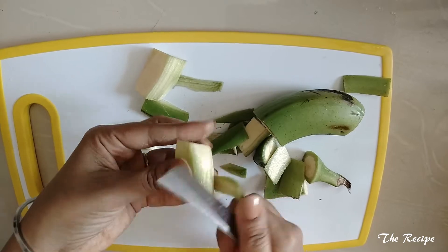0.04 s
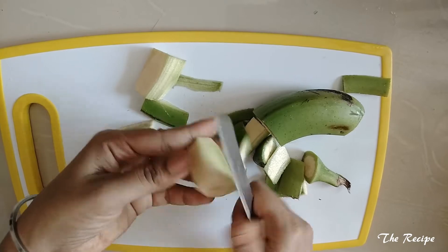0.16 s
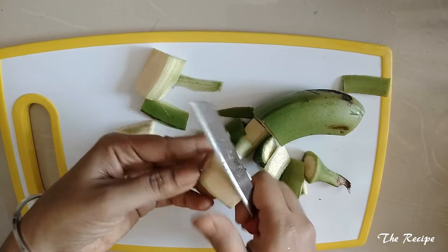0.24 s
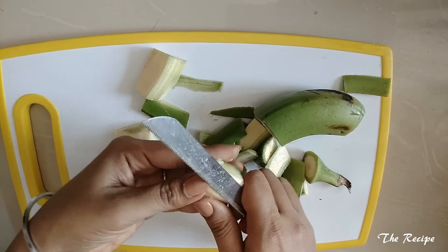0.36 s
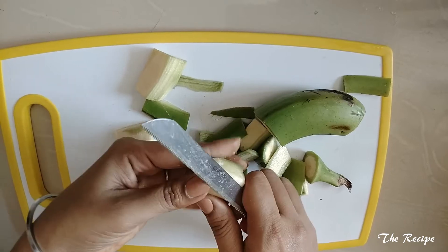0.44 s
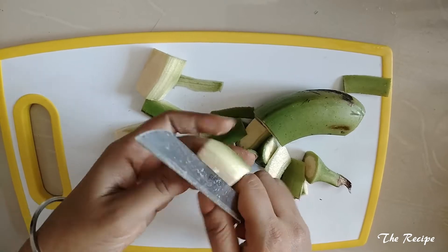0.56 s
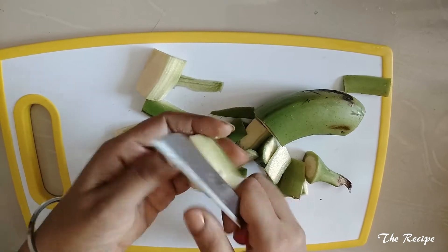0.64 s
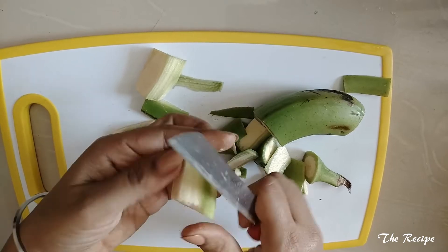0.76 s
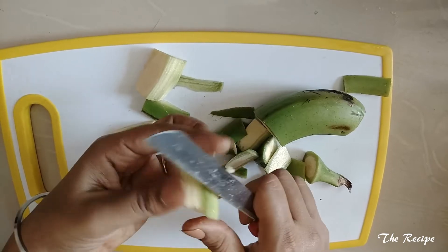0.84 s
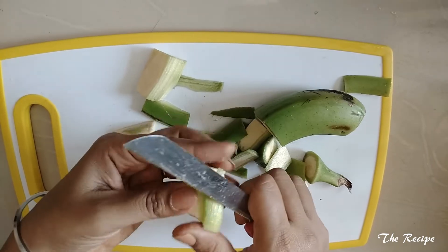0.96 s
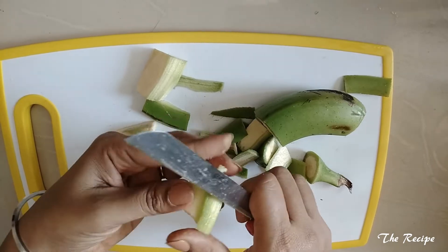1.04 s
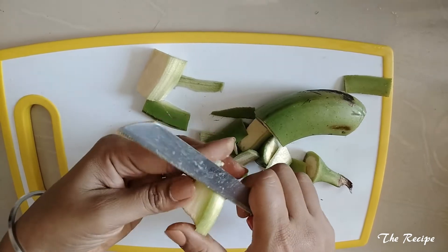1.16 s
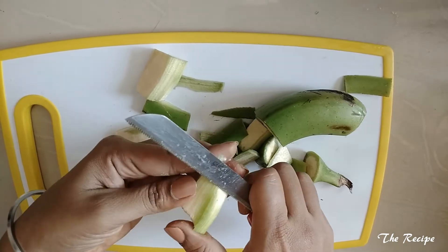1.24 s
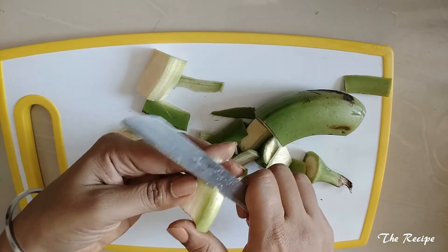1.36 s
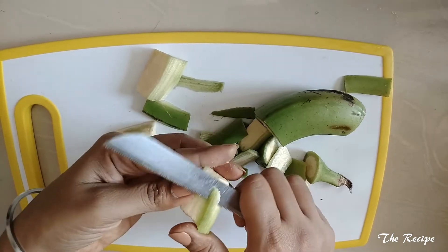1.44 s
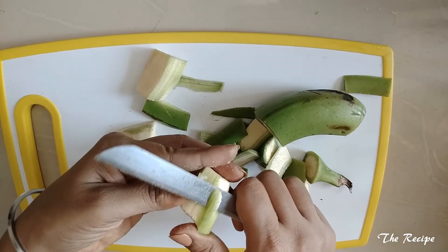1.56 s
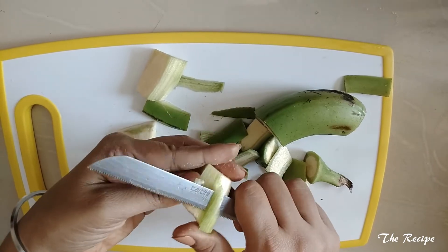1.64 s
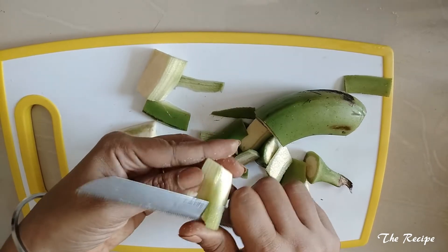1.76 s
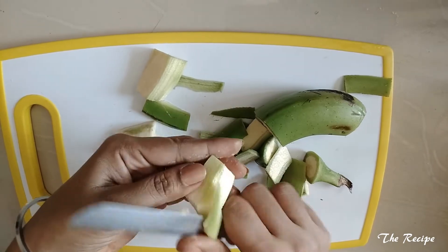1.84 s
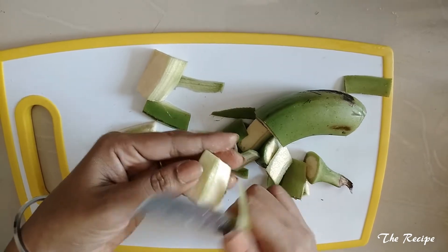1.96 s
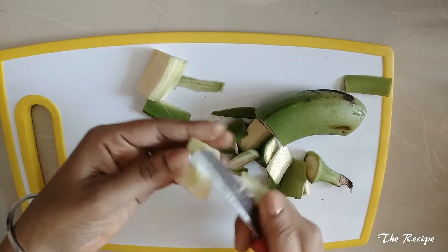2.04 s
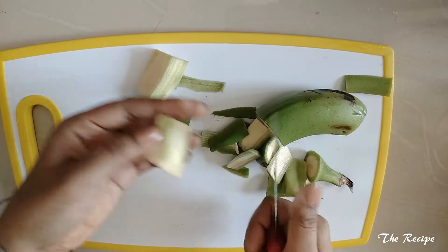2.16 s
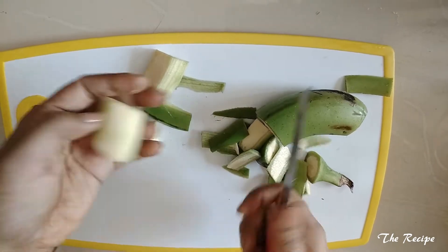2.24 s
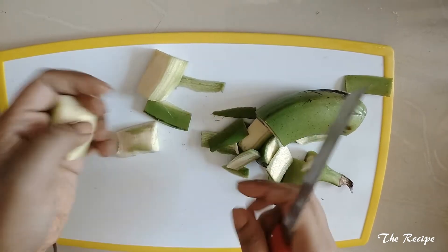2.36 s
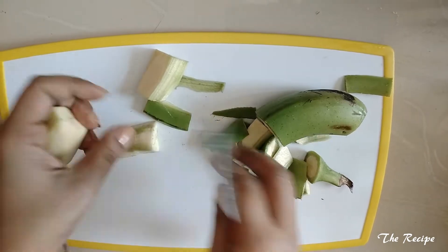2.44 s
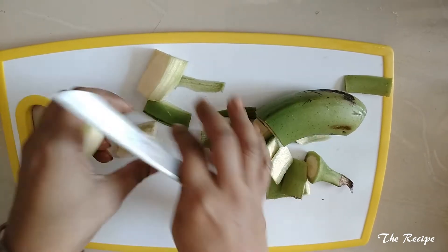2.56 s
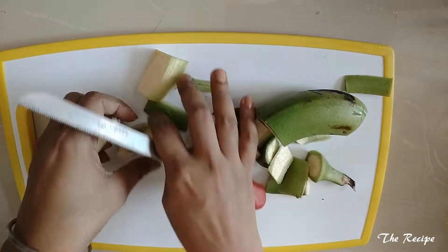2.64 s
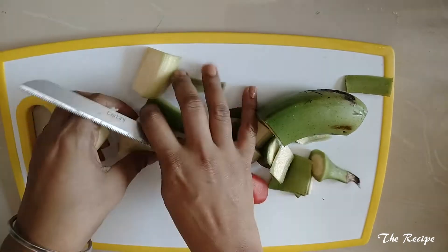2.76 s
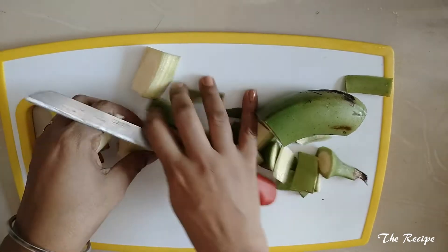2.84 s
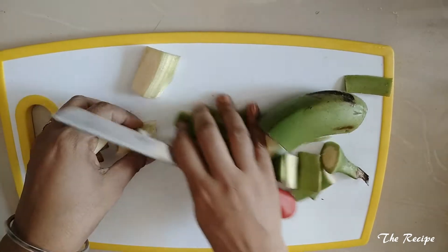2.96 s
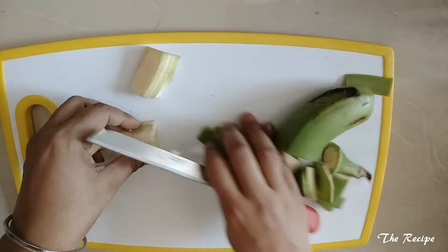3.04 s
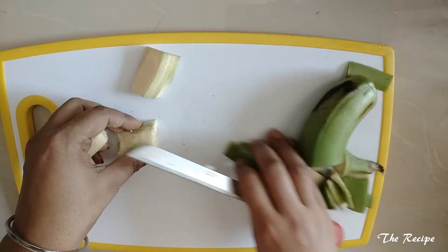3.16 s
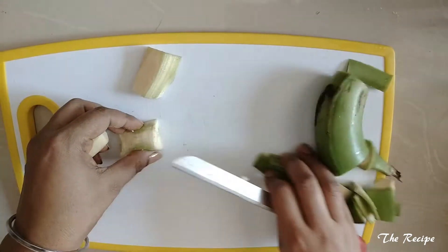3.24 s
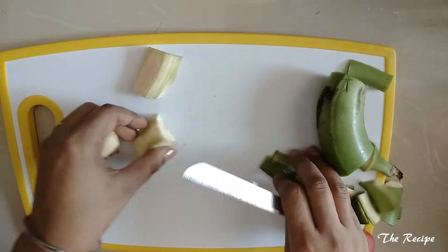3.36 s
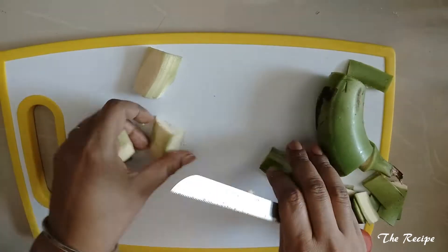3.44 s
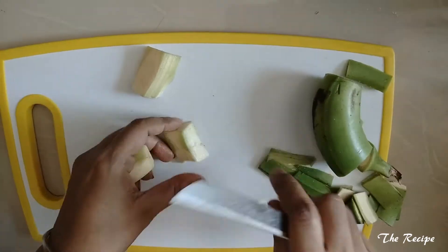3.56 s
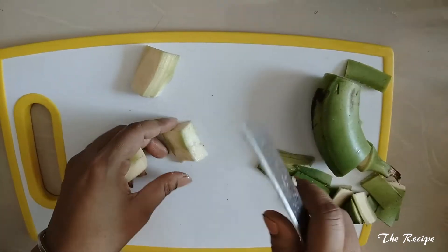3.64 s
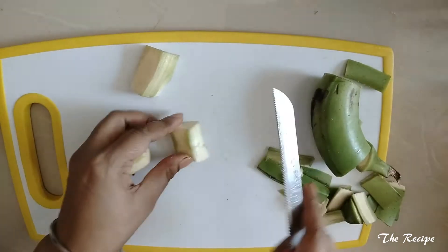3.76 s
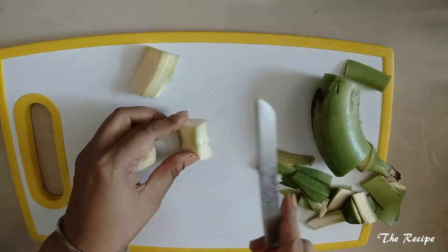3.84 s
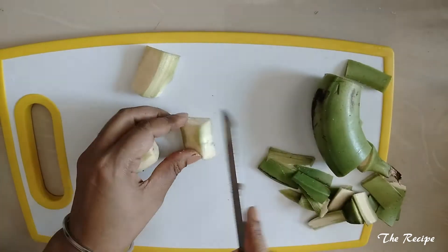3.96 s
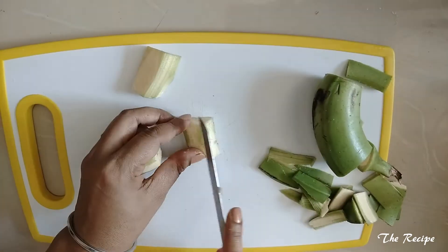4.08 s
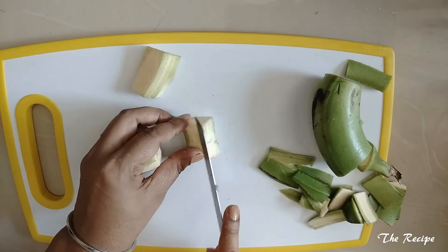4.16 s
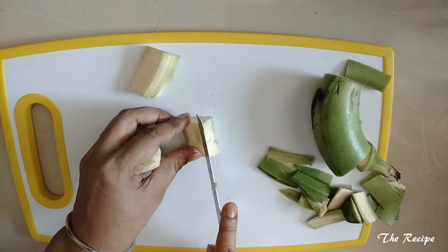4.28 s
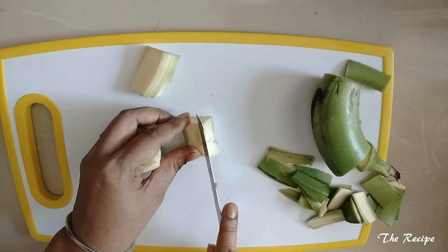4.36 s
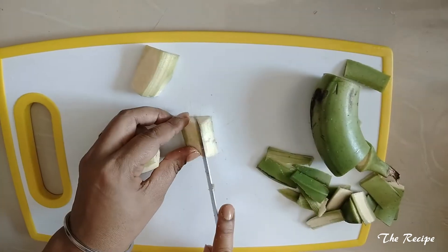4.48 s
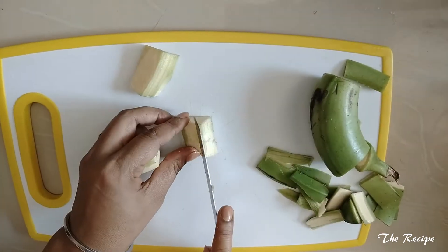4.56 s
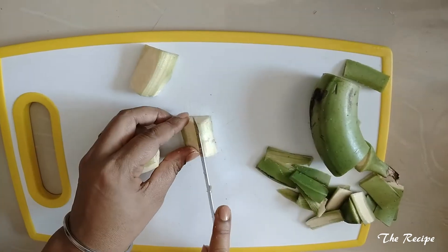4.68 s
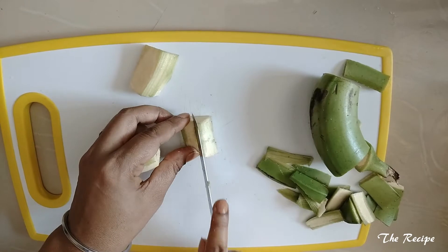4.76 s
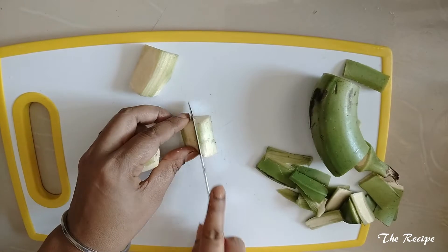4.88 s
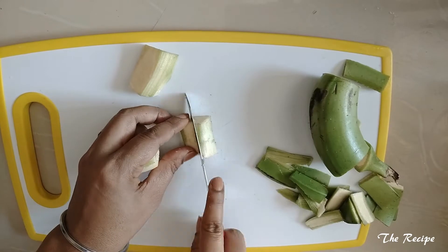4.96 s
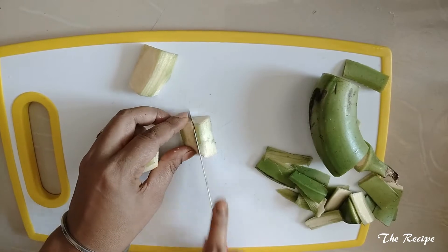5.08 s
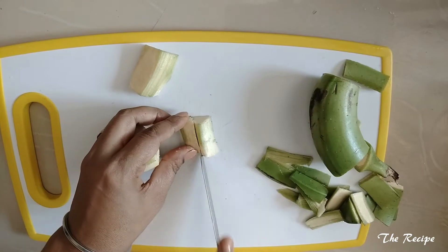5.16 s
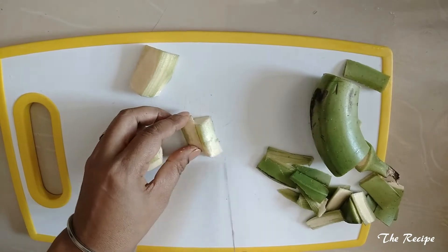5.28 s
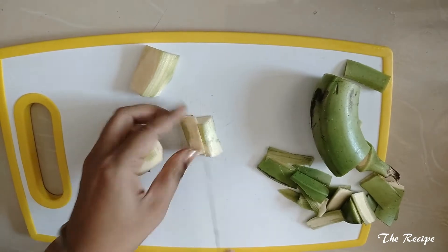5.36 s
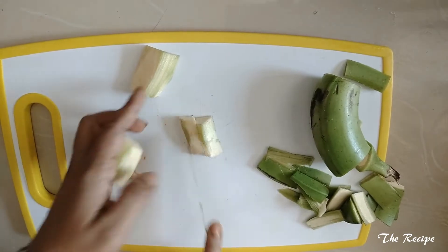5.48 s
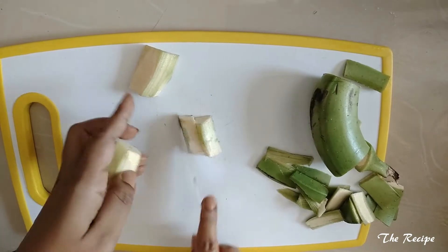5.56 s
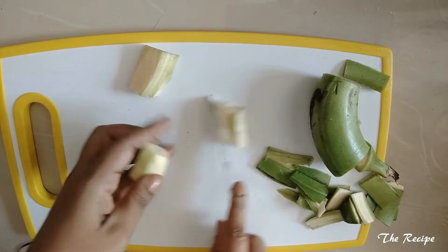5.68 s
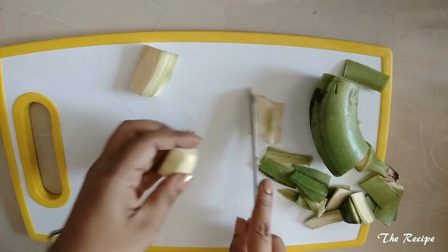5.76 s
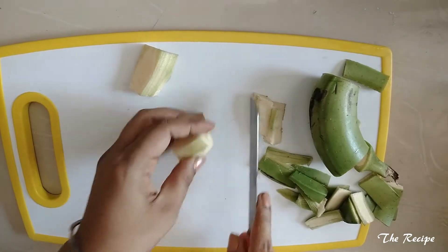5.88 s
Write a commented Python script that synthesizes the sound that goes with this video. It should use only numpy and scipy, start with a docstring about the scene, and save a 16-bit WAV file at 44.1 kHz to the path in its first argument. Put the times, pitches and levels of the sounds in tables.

```python
"""Green banana under the knife

A quiet kitchen, a two-port microphone close above a plastic board: hands peel a green banana with a kitchen
knife, drop a piece, sweep the peels aside, saw through the fruit and scrape it along the board.
Grains of noise drive ringing modes of board and blade and a coloured hiss of wet skin; blows ring the same modes.
Shaped noise hums behind; sagging sine whistles are distant chirps and one faint low toot; sparse echoes
give the room."""
import sys
import numpy as np
from scipy import signal
from scipy.fft import rfft, irfft
from scipy.io import wavfile
from scipy.ndimage import uniform_filter1d

SR = 44100
rng = np.random.default_rng(int(sys.argv[2]) if len(sys.argv) > 2 else 0)


def to_wav(sig):
    """Store sig (one row per channel, or 1-D mono) as 16-bit WAV at the path in sys.argv[1].

    Samples outside -1..1 are clipped; the rate is SR.
    """
    pcm = np.clip(np.atleast_2d(sig), -1, 1) * 32767
    pcm = np.round(pcm).astype(np.int16)
    wavfile.write(sys.argv[1], SR, pcm.T)  # frames by channels


def field_ratio(decibels):
    """Amplitude ratio for a level in dB (20 dB per decade); scalars and array-likes work."""
    return 10 ** (np.asarray(decibels, dtype=float) / 20)


N = 260565  # samples


def evened(x):
    """Scales to rms 1."""
    return x / np.sqrt(np.mean(x ** 2) + 1e-20)


def wander(n, *sizes):
    """Slow random course of rms 1: noise averaged over each of the given numbers of samples."""
    course = rng.standard_normal(n)
    for size in sizes:
        course = uniform_filter1d(course, size)
    return evened(course)


def read(points, hz):
    """A table read on a log-frequency axis."""
    f, value = np.transpose(points)
    return np.interp(np.log(hz + 1), np.log(f + 1), value)


def coloured(x, points):
    """Causal minimum-phase filter of unit energy with the given colour."""
    half = read(points, np.fft.rfftfreq(1024, 1 / SR)) * np.log(10) / 20
    log_gain = np.r_[half, half[-2:0:-1]]
    taps = np.fft.ifft(np.exp(np.conj(signal.hilbert(log_gain)))).real[:512]
    taps = taps[None] / np.linalg.norm(taps)
    return signal.oaconvolve(x, taps, axes=1)[:, :x.shape[1]]


def add(mix, s, sound, lag_ms=0.):
    """Mixes a two-port sound in, the left port later by the lag."""
    for port, late in zip((0, 1), (lag_ms / 1000, 0)):
        part = mix[port, round((s + late) * SR):][:sound.shape[1]]
        part += sound[port, :len(part)]


def lag(s):
    """Left-port delay [ms]: the knife works right of the ports, the drop and the sweep pass under them."""
    return .18 * (not 2.5 < s < 4)


# hum of the kitchen, relative spectrum: (f/Hz, level/dB per Hz)
HUM_COLOUR = [(15, -66), (40, -61), (75, -11), (140, -2.5), (210, -3.5), (350, -10), (560, -6), (900, -10),
              (1500, -11.5), (3300, -16), (4700, -17.5), (5100, -24), (6500, -23.5), (9000, -23.5),
              (11500, -26), (16000, -29)]
# likeness of the hum at the two ports: (f/Hz, correlation -1 to 1)
HUM_LIKENESS = [(60, 0.81), (180, 0.8), (550, 0.37), (1650, -0.07), (4970, -0.09), (15000, -0.01)]
# balance of the hum: (f/Hz, left minus right level/dB)
HUM_BALANCE = [(60, 7.5), (180, 18.5), (550, 0.5), (1650, 2), (4970, -1), (15000, -3)]
# course of the low rumble; its rise and fall about the mean is scaled by frequency: (t/s, level/dB)
RUMBLE_COURSE = [(0.0, -62), (1.04, -60), (2.76, -59), (3.31, -45.5), (3.9, -58.5), (4.54, -60),
                 (5.02, -55), (5.6, -62.5), (5.91, -59)]


def hum():
    """Room air: random short-time spectra with faint patches and a slow swell, bass stronger at the left port."""
    frames, hz = N // 256 + 5, np.fft.rfftfreq(1024, 1 / SR)
    a, b, c, d = rng.standard_normal((frames, 513, 4)).T
    patches = rng.standard_normal((513, frames))
    for axis in (0, 1):
        patches = uniform_filter1d(patches, size=14, axis=axis)
    patches = evened(patches)

    left, other = a + 1j * b, c + 1j * d
    same = np.clip(read(HUM_LIKENESS, hz), -1, 1)[:, None]
    z = np.array([left, same * left + np.sqrt(1 - same ** 2) * other])

    s, rumble_db = np.transpose(RUMBLE_COURSE)
    rumble = np.interp(np.arange(frames) * 256 / SR, s, rumble_db - rumble_db.mean())
    rumble_share = read([(300, 1.22), (500, 0.44)], hz)[:, None]  # strongest in the bass
    swell = wander(frames, 50) + rumble * rumble_share

    lean = read(HUM_BALANCE, hz)[:, None] / 2
    colour_db = read(HUM_COLOUR, hz)[:, None]
    z *= field_ratio(colour_db + 2.2 * patches + .6 * swell + np.array([lean, -lean]))
    return field_ratio(-51) * evened(signal.istft(z, nperseg=1024, noverlap=768)[1][:, :N])


# likeness of near sounds at the two ports: (f/Hz, likeness 0-1)
NEAR_LIKENESS = [(300, 0.2), (650, 1), (1100, 0.54), (2200, 0.1), (4500, 0), (7000, 0), (14000, 0)]


def grit(n, per_s, spread_db):
    """Two-port train of tiny catches, alike mostly around 650 Hz, unrelated in the treble; rms 1."""
    size = field_ratio(spread_db * np.minimum(rng.exponential(1, (2, n)), 4)) * rng.standard_normal((2, n))
    caught = rng.random((2, n)) < per_s / SR
    a, b = rfft(size * caught)
    same = np.clip(read(NEAR_LIKENESS, np.fft.rfftfreq(n, 1 / SR)), 0, 1)
    return evened(irfft([a, same * a + np.sqrt(1 - same ** 2) * b], n))


# colour of the hiss and cracks of wet skin as picked up by the microphone: (f/Hz, relative level/dB)
SKIN_COLOUR = [(1200, -14.5), (2500, -8), (4500, -7.5), (6000, -3), (7500, -3), (9000, 3), (10500, -2),
               (12500, -7.5), (14300, -6.5), (16000, -38)]


def skin(catches):
    """Tiny catches of wet skin, heard through the microphone as a bright hiss."""
    return coloured(catches, SKIN_COLOUR)


def rustle():
    """Fingers shift on the wet fruit: a faint hiss that comes and goes."""
    grip = np.clip(wander(N, 1200, 300), -2, 2)
    return field_ratio(-68) * skin(grit(N, per_s=8300, spread_db=5.5) * field_ratio(5 * grip))


def kitchen(x, t60):
    """Sparse reflections of random sign, other ones at each port, duller than the source."""
    slots = np.arange(120, SR // 2 - 20, 20)
    at = slots + rng.integers(0, 20, (2, len(slots)))
    taps = np.zeros((2, SR // 2))
    np.put_along_axis(taps, at, rng.choice([-1., 1.], at.shape), 1)
    taps *= field_ratio(-60 * np.arange(SR // 2) / SR / t60)
    wet = signal.oaconvolve(x.mean(0)[None], taps / np.linalg.norm(taps[0]), axes=1)[:, :N]
    return coloured(wet, [(200, -6), (2000, -10), (6000, -3), (15000, -28)])


def radiated(x, corner_hz=450):
    """A small board or blade moves air poorly in the bass."""
    return signal.sosfilt(signal.butter(3, corner_hz, "high", fs=SR, output="sos"), x)


# modes of the plastic board: (f/Hz, relative level/dB, t60/s, left minus right level/dB)
BOARD_MODES = [(230, -9, .03, -0.5), (307, -9, 0.045, -3), (574, -6.5, .025, -0.5), (687.6, 2, 0.0832, 0.5),
               (767, 4.5, 0.042, -0.5), (893, 3, 0.025, 4), (1022, 3.5, .04, -5.5),
               (1110, -3.5, 0.049, -12), (1259, 4.5, 0.027, 4.5), (1375, 5.5, 0.037, 3.5),
               (1492, 8, 0.029, 7), (1645, 7, .035, 6), (1700, 8, 0.021, -3.5), (1900, 3, .03, -12.5),
               (2250, -3, .02, -2.5), (2420, -26.5, .02, -3)]
# modes of the knife blade: (f/Hz, relative level/dB, t60/s, left minus right level/dB)
BLADE_MODES = [(2204, 0.5, 0.02, -6.5), (2450, 3, 0.0068, 2.5), (2970, 2, 0.01045, -12),
               (3235, -1.5, 0.075, 8), (3400, 0.5, 0.016, 4), (3870, 6.5, 0.005, 1),
               (4070, -2.5, 0.025, -5.5), (4360, -3.5, .015, 14), (4630, -1.5, 0.011, 1)]


def ring(drive, modes, pitch_hz=None, octaves=.6):
    """Rings every mode; a contact drives mostly the modes near the pitch of its spot."""
    out, power = np.zeros(drive.shape), 0
    for hz, db, t60, lean_db in modes:
        r, w = 1000 ** (-1 / (t60 * SR)), 2 * np.pi * hz / SR
        near = field_ratio(db)
        if pitch_hz is not None:
            near = near * np.exp(-.5 * (np.log2(hz / pitch_hz) / octaves) ** 2)
        unit = 2 * np.sqrt(1 - r) * np.sin(w)  # impulse response of energy 1
        mode = signal.lfilter([0, unit], [1, -2 * r * np.cos(w), r * r], drive * near)
        out += mode * field_ratio([[lean_db / 2], [-lean_db / 2]])
        power = power + near ** 2
    return out / np.sqrt(power)


def delayed_time():
    """Time [s] of a 90 ms sound, held at 0 for the first 1.1 ms."""
    return np.maximum(np.arange(round(.09 * SR)) / SR - .0011, 0)


def crack(db):
    """A few milliseconds of dense treble grit."""
    t = delayed_time()
    return field_ratio(db) * skin(grit(len(t), per_s=17000, spread_db=1.5) * np.exp(-t / 0.0029) * (t > 0))


def knock(board_db, pitch_hz, blade_db):
    """After a short silent lead, a blow with two small rebounds rings board and blade under a crack."""
    t = delayed_time()
    blow = np.zeros((2, len(t)))
    blow[:, np.searchsorted(t, [.0001, .0008, .0017])] = -1, .45, -.3
    # local dent, dies at once
    thump = -field_ratio(14.5) * (t / .0007) * np.exp(-t / .0007) * np.sin(2 * np.pi * 1.1 * pitch_hz * t)
    board = field_ratio(8.0) * ring(blow, BOARD_MODES, pitch_hz, octaves=1.0) + thump
    click = coloured(blow * field_ratio(20.0), [(1500, -37.0), (2800, 6.0), (4600, -7.5), (5600, -12.5)])
    blade = field_ratio(15.0) * ring(blow, BLADE_MODES) + click
    sound = field_ratio(board_db) * radiated(board, corner_hz=267) + field_ratio(blade_db) * radiated(blade, corner_hz=1509)
    return sound + crack(-24.5 + 0.57 * blade_db)  # the crack grows more slowly than the ring of the blade


# knocks and ticks close to the ports: (t/s, board drive level/dB, board pitch f/Hz, blade drive level/dB)
KNOCK_EVENTS = [(0.077, -43.5, 1110, -52), (0.242, -45, 297, -68), (2.024, -43.5, 1020, -34),
                (2.223, -48.5, 498, -32), (2.279, -42, 1100, -35), (2.293, -36, 640, -42),
                (2.302, -39.5, 670, -35.5), (2.365, -43, 710, -47.5), (2.717, -5, 996, -19),
                (2.792, -35, 1140, -54), (3.297, -29.5, 740, -44.5), (3.537, -42.5, 660, -61),
                (3.6, -45, 760, -49), (4.639, -47, 532, -52.5), (4.941, -23, 1400, -27.5),
                (5.283, -30, 1210, -46), (5.596, -20.5, 1330, -27.5), (5.629, -31, 1290, -46),
                (5.89, -36, 318, -58)]


def knocks(near):
    """Knocks and ticks of board and blade, each blow with its own board pitch."""
    for s, *row in KNOCK_EVENTS:
        add(near, s, knock(*row), lag(s))


def chirp(length, start_hz, db):
    """A fuzzy whistle that sags a little, in the same sign at both ports, 2 dB louder at the left."""
    n = round(length * SR)
    sag = 1 - .2 * np.arange(n) / SR  # share of the pitch lost per second
    hz = start_hz * sag * (1 + .016 * wander(n, 250))
    whistle = np.sin(2 * np.pi * np.cumsum(hz) / SR) * np.hanning(n) ** 0.21
    return field_ratio(db) * whistle * np.array([[1], [-1]]) * field_ratio([[0], [0]]) * field_ratio([[1], [-1]]) / np.array([[1], [-1]])


# distant chirps and one faint low toot: (t/s, length t/s, starting f/Hz, direct level/dB)
CHIRP_EVENTS = [(0.368, 0.0476, 3250, -61), (0.589, 0.074, 3640, -53.5), (.6, 0.15, 3270, -63),
                (1.27, 0.068, 520.6, -57), (3.858, 0.1, 4070, -57.5), (3.992, 0.037, 3400, -57),
                (4.028, 0.061, 2680, -57), (4.233, 0.069, 3080, -57), (4.251, 0.097, 2690, -57),
                (4.281, 0.074, 3380, -54), (4.356, 0.085, 2310, -55)]


def chirps():
    """Distant chirps and one faint low toot, more echo than direct sound."""
    far = np.zeros((2, N))
    for s, *row in CHIRP_EVENTS:
        add(far, s, chirp(*row), lag_ms=.1)
    return far + field_ratio(3) * kitchen(far, t60=.3)


def slip(length, db):
    """Wet skin tears in a hiss that starts and stops at once; blade and fruit sound faintly with it."""
    t = np.arange(round((length + 0.12) * SR)) / SR
    n, after = len(t), np.maximum(t - length, 0)
    onset, release = np.clip(t / (0.069 * length), 0, 1), np.exp(-after / 0.0046)
    shape = onset * field_ratio(-4 * t / length + 1.3 * wander(n, 300)) * release
    blade = ring(grit(n, per_s=3100, spread_db=2.5) * shape, BLADE_MODES)
    lazy = np.clip(t / .01, 0, 1) * np.exp(-after / 0.089)  # the fruit lingers
    # the fruit borrows the board modes near 690 Hz
    fruit = ring(grit(n, per_s=3500, spread_db=-2.5) * lazy, BOARD_MODES, 690, 0.37)
    hiss = skin(grit(n, per_s=6900, spread_db=0.0) * shape)
    return field_ratio(db) * (hiss + field_ratio(-13.5) * radiated(blade, corner_hz=1830) + field_ratio(-21.5) * radiated(fruit))


# the blade slips under the peel, right of the ports: (t/s, length t/s, hiss drive level/dB)
SLIP_EVENTS = [(0.53, 0.068, -61.5), (0.635, 0.0145, -57), (0.698, 0.046, -54), (0.8, 0.023, -51),
               (0.883, .006, -58), (0.956, 0.022, -54.5), (0.996, 0.018, -51.5), (1.268, 0.037, -58),
               (1.363, 0.017, -55), (1.396, 0.047, -46.5), (1.435, 0.028, -53.5), (1.461, 0.0215, -40.5),
               (1.486, 0.094, -42.5), (1.59, 0.08, -42), (1.693, 0.011, -39), (1.716, 0.092, -39.5),
               (1.815, 0.026, -36), (1.841, 0.067, -54.5), (1.988, 0.038, -58), (2.269, 0.049, -49),
               (4.253, 0.0078, -55), (4.624, 0.023, -60)]


def peeling(near):
    """Hands peel the banana, one short tear after another."""
    for s, *row in SLIP_EVENTS:
        add(near, s, slip(*row), lag_ms=.2)


# wet skin snaps free close to the ports: (t/s, drive level/dB)
SNAP_EVENTS = [(2.007, -40.5), (2.792, -30.5), (3.446, -40), (5.417, -30), (5.488, -35)]


def snaps(near):
    """Wet skin snaps free in a bare crack."""
    for s, db in SNAP_EVENTS:
        add(near, s, crack(db), lag(s))


def stroke(rows, start_hz, end_hz, spread, follow, over_db):
    """Catches of the sliding contact ring the board and the blade, the skin hisses above."""
    s, *columns = np.transpose(rows)
    t = np.arange(s[0], s[-1], 1 / SR)
    n = len(t)
    board_db, hiss_db = (np.interp(t, s, c) for c in columns)
    pitch_hz, follow = np.geomspace(start_hz, end_hz, n), np.clip(follow, 0, 1)
    blade_db = over_db + follow * board_db + (1 - follow) * hiss_db
    judder = field_ratio(1.12 * wander(n, 200, 200))  # uneven grip

    spot_drive = grit(n, per_s=3000, spread_db=-0.8) * judder * field_ratio(board_db)
    spot = ring(spot_drive, BOARD_MODES, pitch_hz, np.clip(spread, .15, 1.5))
    # the spot sounds only above a share of its pitch; the whole board answers low down
    spot = radiated(spot, field_ratio(-6 * spread) * 0.83 * min(start_hz, end_hz))
    body_drive = grit(n, per_s=1500, spread_db=3.0) * judder * field_ratio(board_db - 12.5)
    body = ring(body_drive, BOARD_MODES, 530, 0.22)

    blade = ring(grit(n, per_s=6000, spread_db=1.4) * judder * field_ratio(blade_db), BLADE_MODES)
    hiss = skin(grit(n, per_s=14000, spread_db=3.0) * field_ratio(hiss_db))
    fade = np.clip(np.minimum(t - t[0], t[-1] - t) / 0.00067, 0, 1)
    return (radiated(spot + body) + radiated(blade, corner_hz=1847) + hiss) * fade


# one curve a stroke over the board: skid, sweep, settling peels, two saw strokes, cut through, scrape;
# (t/s, board drive level/dB, skin hiss drive level/dB)
STROKE_CURVES = [
    [(2.723, -9.5, -48), (2.727, -27.5, -57), (2.761, -31.5, -55.5), (2.779, -32.5, -54),
     (2.795, -38.5, -50), (2.809, -40.5, -55), (2.93, -46, -50.5)],
    [(2.93, -38, -51), (2.952, -36.5, -45), (3.006, -34.5, -45), (3.012, -37.5, -42), (3.04, -34.5, -42.5),
     (3.08, -39, -42), (3.168, -38.5, -35.5), (3.25, -38, -41), (3.29, -45, -38)],
    [(3.29, -40, -41), (3.298, -33, -39), (3.342, -36.5, -43), (3.418, -68, -61), (3.526, -63, -54),
     (3.54, -54, -52), (3.548, -60, -45.5), (3.596, -57, -50), (3.7, -86, -69)],
    [(4.72, -60, -58.5), (4.808, -50, -47), (4.818, -43, -41), (4.898, -39.5, -44), (4.932, -38.5, -38.5),
     (4.944, -29, -37), (4.952, -40.5, -42.5), (5.014, -53, -61), (5.04, -55, -60)],
    [(5.04, -53, -63), (5.052, -58, -54), (5.092, -41, -42.5), (5.198, -37, -38), (5.265, -46.5, -50.5)],
    [(5.265, -51.5, -59), (5.287, -25, -40.5), (5.307, -34.5, -37.5), (5.317, -43, -56), (5.343, -48, -53),
     (5.425, -55.5, -49.5), (5.429, -56.5, -58.5), (5.583, -68, -51), (5.59, -63, -57)],
    [(5.605, -48, -53.5), (5.635, -33, -53), (5.641, -41.5, -59), (5.703, -23.5, -32), (5.751, -27, -32),
     (5.789, -35, -42), (5.815, -35, -38.5), (5.843, -47, -51.5), (5.908, -46.5, -58)],
]
# contact of each stroke: (board pitch at the start f/Hz, at the end f/Hz, spread/octaves,
# how far the blade follows the board rather than the hiss 0-1, blade drive over that level/dB)
STROKE_CONTACTS = [(1104, 860, 0.43, 0.3, -7), (1070, 1270, 0.27, 0.06, -5.5), (760, 460, 0.57, 0.47, -8.5),
                   (714, 1120, 0.47, 0.6, -9.5), (1090, 1300, 0.77, 0.64, -3.5),
                   (1170, 1960, 0.18, 0.65, -0.5), (1330, 1630, 0.14, 0.28, 3)]


def strokes(near):
    """The piece skids, peels are swept and settle, the knife saws, cuts through and scrapes."""
    for rows, contact in zip(STROKE_CURVES, STROKE_CONTACTS):
        add(near, rows[0][0], stroke(rows, *contact), lag(rows[0][0]))


def scene():
    """Peeling, strokes and knocks near the ports, the room and distant chirps behind."""
    near = rustle()
    for play in (knocks, peeling, snaps, strokes):
        play(near)
    return near + field_ratio(-19) * kitchen(near, t60=.22) + chirps() + hum()


# response of the two ports, with a dip above 5 kHz and a treble edge: (f/Hz, level/dB, left minus right level/dB)
PORT_RESPONSE = [(20, -16, 0), (50, -5, 0), (70, 0, 0), (4800, 0, 0), (5300, -5, 0), (6600, -3, 0),
                 (8000, 0, 0), (10500, 0, 1), (12500, 0, 5), (14300, 0, 5), (14450, -34, 3),
                 (16000, -40, 3)]


def ports(dry):
    """The microphone colours each port: thin deep bass, a dip above 5 kHz, little above the treble edge."""
    hz, table = np.fft.rfftfreq(N, 1 / SR), np.array(PORT_RESPONSE)
    lean = read(table[:, [0, 2]], hz) / 2
    return irfft(rfft(dry) * field_ratio(read(table[:, :2], hz) + np.array([lean, -lean])), N)


def band_limit(x):
    """A steep low-pass at the top of the band."""
    return signal.sosfilt(signal.butter(12, 15600, fs=SR, output="sos"), x)


def record(dry):
    """Colour of the ports, then overload: peaks beyond full scale are cut flat."""
    mix = np.clip(ports(dry), -1, 1)
    return band_limit(mix)


dry = scene()
out = record(dry)
to_wav(out)
```